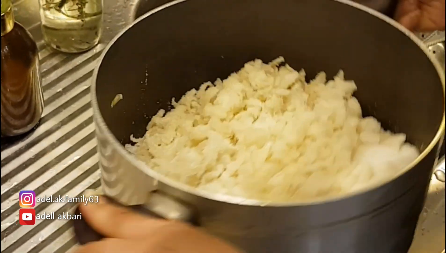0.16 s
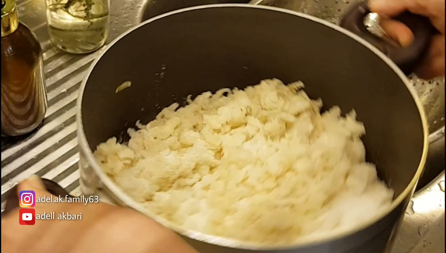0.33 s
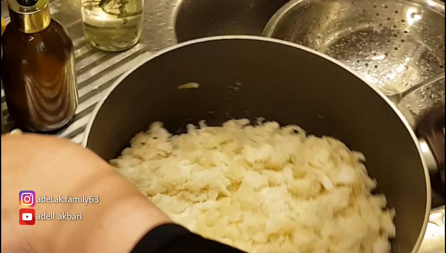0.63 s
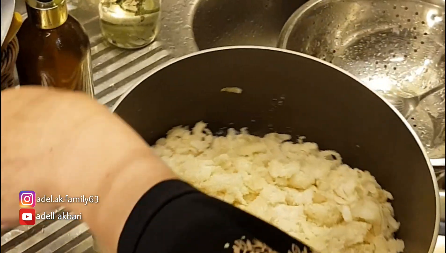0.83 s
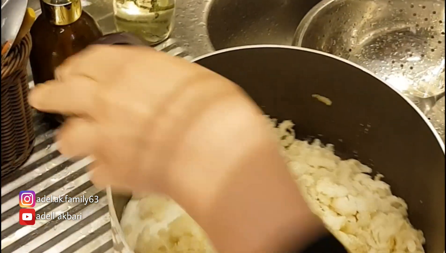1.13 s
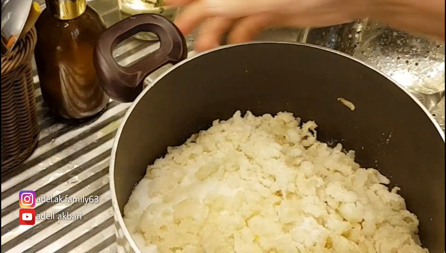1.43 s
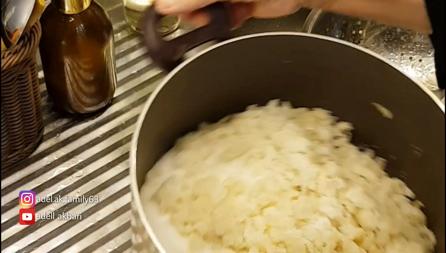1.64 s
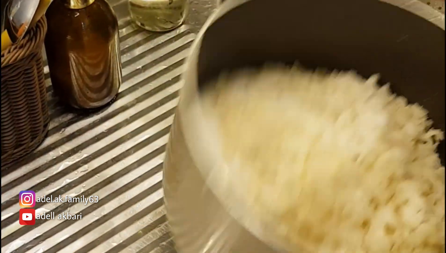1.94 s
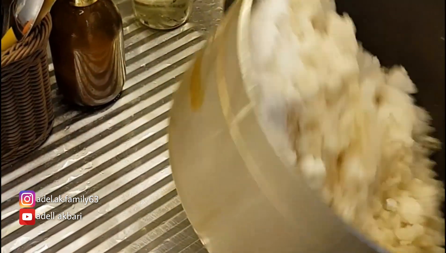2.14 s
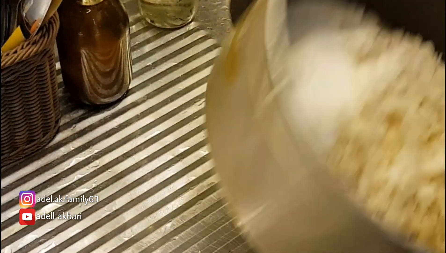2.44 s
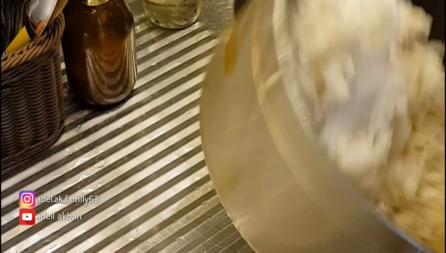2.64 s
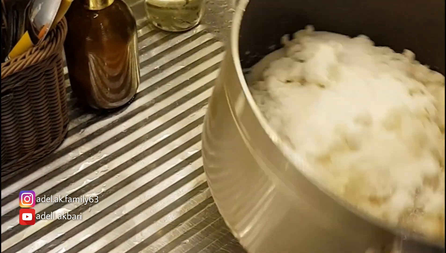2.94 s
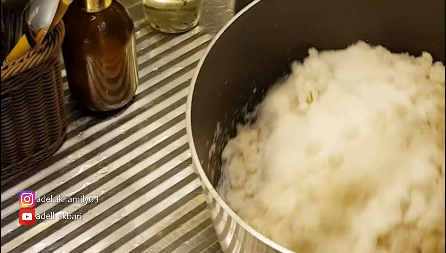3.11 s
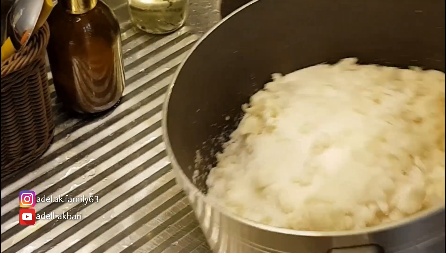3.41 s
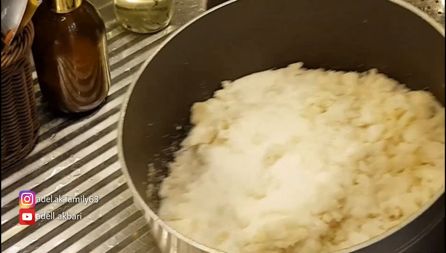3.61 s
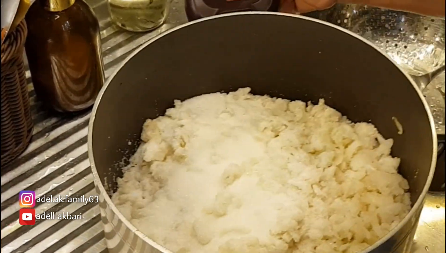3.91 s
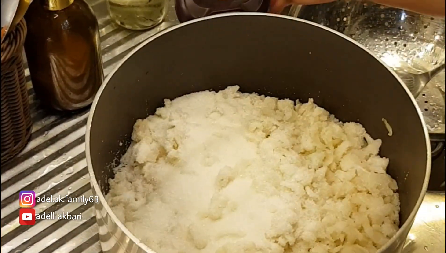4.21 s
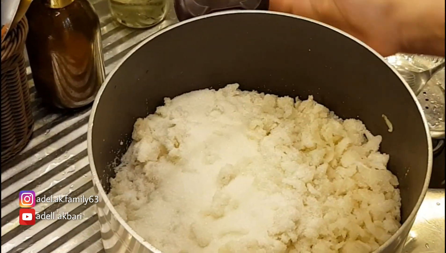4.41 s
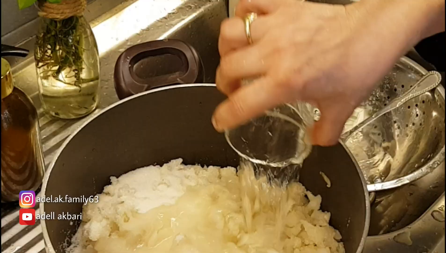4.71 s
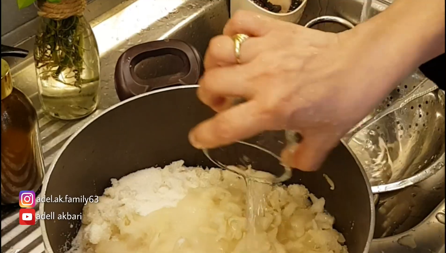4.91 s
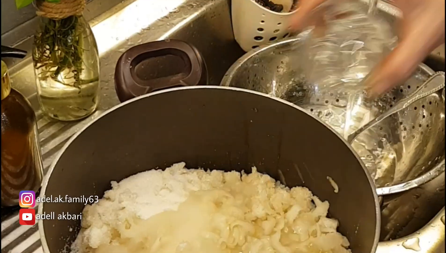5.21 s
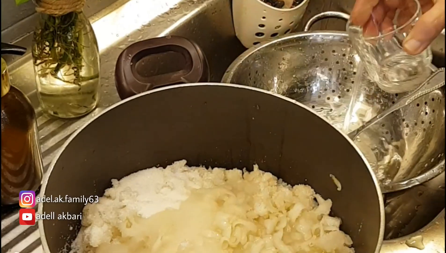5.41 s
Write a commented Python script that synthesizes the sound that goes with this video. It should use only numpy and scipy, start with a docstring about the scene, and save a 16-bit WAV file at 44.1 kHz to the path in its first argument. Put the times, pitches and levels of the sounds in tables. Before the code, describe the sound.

A close, wide stereo kitchen scene with low room rumble and a faint whining hiss. It begins almost silent, with a barely audible tick at 0.5 s. At 0.9 s a heavy steel pot hits a ribbed sheet-metal drainer: a loud crack, deep boom and bright rattle. From 1.15 to 1.3 s a tight cluster of clanks follows, the pot wall ringing briefly around 1 kHz, with scraping and a thin high squeak. Weaker scuffs and a tap come at 1.5-1.9 s. The food is tossed at 2.2-2.3 s and more strongly at 2.7-2.8 s: a grainy wet slide, a sharp slap, then settling crumbs. Quiet, with faint metallic rubbing, until a booming landing at 4.03 s and smaller knocks, scraping and rattling to 4.75 s. Sudden silence lasts about 0.1 s; from 4.88 s water splashes steadily, bubbly and bright, with metallic bowl resonance and small plinks, to the end.

```python
"""In a kitchen, a heavy steel pot of wet food is shifted, knocked and shaken on a ribbed sheet-steel drainer.
The sheet booms as a few low modes and rattles as shaped noise; the pot wall rings as decaying sines.
Rubbed metal sings, the food slides and slaps as grainy noise, and a faint whining hiss stands behind.
After a short silence a tap runs steadily into the sink: splash noise, bowl resonances and ringing bubbles."""
import sys
import numpy as np
from scipy import signal
from scipy.io import wavfile

SR = 44100
rng = np.random.default_rng(int(sys.argv[2]) if len(sys.argv) > 2 else 0)


def transcribe(u):
    """Save the signal u as a 16-bit wav file named by the first command-line argument.

    u: samples, shape (n,) or (channels, n), limited to [-1, 1]; the rate is SR.
    q: integer samples, one column per channel.
    """
    v = np.clip(np.atleast_2d(u).T, -1, 1)
    q = np.round(v * 32767).astype(np.int16)
    wavfile.write(sys.argv[1], SR, q)


N = 244755

# Knocks of the pot on the sheet: (time [s], rattle level [dB], rattle brightness [dB per octave],
# crack level [dB])
KNOCKS = [(0.517, -49.5, 8, -67), (0.8947, -13, 3.5, -17.5), (0.987, -33.5, -2, -20),
          (1.166, -14, 0, -22.5), (1.234, -16.5, 1, -24), (1.306, -21, 1.5, -43), (1.511, -41.5, 7.5, -48),
          (1.6764, -44, 8, -54), (1.774, -52.5, 11, -38), (1.857, -25.5, 3.5, -46), (3.142, -52, -4, -66),
          (3.929, -42.5, 1.5, -54), (4.028, -14.5, 3, -29), (4.1228, -24, 3, -33), (4.185, -23, 3.5, -25.5),
          (4.401, -23, 1, -34), (4.471, -27.5, 1.5, -39), (4.512, -29, 0.5, -35), (4.564, -39, -3.5, -37.5),
          (4.649, -26.5, 3.5, -36.5), (4.738, -35, -1.5, -35.5)]
# Movements of the pot over the drainer: (start [s], swell [s], hold [s], scrape level [dB],
# rumble level [dB], brightness [dB per octave])
MOVES = [(0, 0.017, 0.58, -70.5, -57, -6), (0.891, 0.0054, 0.073, -27.5, -27, 1),
         (1.143, 0.029, 0.11, -28, -28.5, 5.5), (1.381, 0.014, 0.14, -43, -46.5, -1),
         (1.691, 0.018, 0.053, -45.5, -56, 4), (1.722, 0.081, 0.16, -40, -35.5, 0.5),
         (2.201, 0.098, 0.035, -53.5, -61.5, 1), (2.695, 0.041, 0.1, -55.5, -61, 6),
         (3.736, 0.22, 0.14, -63.5, -48, -9.5), (4.015, 0.014, 0.19, -38, -29, -0.5),
         (4.263, 0.097, 0.38, -41, -35, 0.5)]
# Modes of the ribs: (frequency [Hz], width [Hz], level [dB])
RIBS = [(2300, 130, 0), (2530, 60, 3), (2850, 90, 0)]
# Likeness of the left and right channels: (frequency [Hz], correlation [-1 to 1])
LIKENESS = [(220, 0.98), (840, 0.082), (3150, -0.31), (11800, 0.2)]
# Stereo balance of the room tone and the splash: (frequency [Hz], left minus right [dB])
AIR_BALANCE = [(60, 1), (500, -1.5), (1430, -15.5), (4100, 8), (11800, 7.5)]


def from_db(db):
    """Level law: an amplitude gain is ten to the power of decibels over 20."""
    return 10 ** (np.asarray(db) / 20)


def rms_one(x):
    """Normalisation: a signal divided by its effective value has unit rms."""
    return x / np.sqrt(np.mean(x ** 2) + 1e-20)


def at_hz(points, hz):
    """Logarithmic pitch scale: a table is interpolated linearly over log frequency."""
    table_hz, values = np.array(points).T
    return np.interp(np.log(hz), np.log(table_hz), values)


def drift(rate):
    """Random modulation: noise low-passed near a rate [Hz] wanders slowly with unit rms."""
    step = 40  # samples between computed points
    r = np.exp(-2 * np.pi * rate * step / SR)
    white = rng.standard_normal(N // step + 2002)
    slow = signal.lfilter([1], [1, -2 * r, r * r], white)[2000:]  # the filter has settled
    return np.interp(np.arange(N) / step, np.arange(len(slow)), rms_one(slow))


def butter(x, order, hz, kind):
    """Butterworth filtering: the passband is maximally flat."""
    return signal.sosfilt(signal.butter(order, hz, kind, fs=SR, output="sos"), x)


def ring(clicks, hz, t60):
    """Impulse response of a damped oscillator: a unit click starts a sine of height 1 that dies away."""
    r = from_db(-60 / (t60 * SR))
    w = 2 * np.pi * hz / SR
    return signal.lfilter([0, np.sin(w)], [1, -2 * r * np.cos(w), r * r], clicks + 1e-18)


def resonate(x, modes, waver_db):
    """Modal superposition: parallel resonances add, each wavering in level."""
    out = 0
    for k, (hz, width, level_db) in enumerate(modes):
        r = np.exp(-np.pi * width / SR)
        poles = [1, -2 * r * np.cos(2 * np.pi * hz / SR), r * r]
        zeros = [(1 - r * r) / 2, 0, (r * r - 1) / 2]
        gain = (-1) ** k * from_db(level_db + waver_db * drift(11))  # alternate polarity
        out = out + gain * signal.lfilter(zeros, poles, x)
    return out


def resonant_noise(modes, waver_db, side_db):
    """Random excitation of resonators: stereo noise takes on the modes' colour; rms 1."""
    mid, side = rng.standard_normal((2, N))
    stereo = mid + from_db(side_db) * side * [[1], [-1]]
    return rms_one(resonate(stereo, modes, waver_db))


def noise_bands(spectrum, likeness, balance, patchy_db):
    """Band synthesis: half-octave stereo noises, each with its level, flicker and width, sum to rms 1."""
    edges = 30 * 2 ** np.arange(0, 8.6, .5)
    white = rng.standard_normal((2, 2, N))
    bands = {}
    for k, (low, high) in enumerate(zip(edges, edges[1:])):
        mid, side = butter(white[k % 2], 2, [low, high], "band")  # neighbours use different noise
        hz = np.sqrt(low * high)
        alike = np.clip(at_hz(likeness, hz), -1, 1)
        pair = np.sqrt(1 + alike) * mid + np.sqrt(1 - alike) * side * [[1], [-1]]
        lean = from_db(at_hz(balance, hz) * np.array([[.5], [-.5]]))
        level = from_db(at_hz(spectrum, hz) + patchy_db * drift(7.1))
        bands[hz] = level * lean * pair
    total = np.sqrt(np.mean(sum(bands.values()) ** 2))
    return {hz: band / total for hz, band in bands.items()}


def kitchen_air():
    """Background noise: low rumble and hiss flicker, with a narrow whine that fades and returns."""
    # Room tone: (frequency [Hz], relative density [dB per Hz])
    room_spectrum = [(59, 6.5), (140, -17.5), (189, -13.5), (1220, -44), (1870, -26), (5730, -32),
                     (11500, -32)]
    # Whine resonances: (frequency [Hz], width [Hz], relative level [dB])
    whine_modes = [(1840, 190, 6), (2600, 250, 1), (3820, 170, 5.5), (5740, 240, 4)]
    # Whine over time: (time [s], level [dB])
    whine_level = [(0, -61.5), (2.501, -70), (4.801, -57)]
    room_tone_db = -54.5
    tone = sum(noise_bands(room_spectrum, LIKENESS, AIR_BALANCE, patchy_db=4.0).values())
    whine = butter(resonant_noise(whine_modes, waver_db=2.5, side_db=-1.0), 4, 1500, "high")
    whine_db = np.interp(np.arange(N) / SR, *np.transpose(whine_level))
    return from_db(room_tone_db) * tone + from_db(whine_db) * whine


def moving(column, fade_db_per_s):
    """Exponential envelopes: the power of each move swells, holds and fades at a steady decibel rate."""
    t = np.arange(N) / SR
    swell_db = 27  # rise within the swell
    powers = []
    for move in MOVES:
        start, swell, hold = move[:3]
        rising_db = swell_db * np.clip(1 - (t - start) / swell, 0, 1)
        falling_db = fade_db_per_s * np.maximum(t - start - swell - hold, 0)
        powers.append((t >= start) * from_db(move[column] - rising_db - falling_db) ** 2)
    return np.array(powers)


def boom(rumble_db):
    """Low plate modes: thuds strike them as soft pushes, and sliding keeps them rumbling."""
    # Low sheet modes: (frequency [Hz], width [Hz], relative level [dB])
    low_modes = [(70.2, 7.9, 4.5), (78.7, 8.5, 2.5), (106.1, 8.1, 1.5), (181, 45.6, -10.5)]
    # The pot's weight lands or rocks over and flexes the sheet: (time [s], push level [dB])
    thuds = [(0.916, -19.5), (0.943, -34), (1.175, -30), (1.289, -34), (1.82, -33), (4.031, -25.5),
             (4.209, -33), (4.495, -34), (4.62, -38)]
    pushes = np.zeros(N)
    pushes[[round(s * SR) for s, db in thuds]] = from_db(np.array(thuds)[:, 1])
    struck = 0
    for hz, width, level_db in low_modes:
        t60 = np.log(1000) / (np.pi * width)  # a narrow mode rings long
        struck = struck + from_db(level_db) * ring(pushes, hz, t60)
    soft = butter(struck, 2, [55, 250], "band")
    rumble = from_db(rumble_db) * resonant_noise(low_modes, waver_db=0.5, side_db=-18)
    return soft * from_db([[.4], [-.4]]) + rumble


def scattered_modes(x):
    """Modal resonance: the clearer sheet modes are lifted out of its noise."""
    # Sheet modes that stand out of the rattle: frequency [Hz]
    clear_modes_hz = [399, 655, 1372, 1550, 1815, 2130, 3270, 4260]
    modes = [(hz, 25, 0.0) for hz in clear_modes_hz]  # width [Hz], level [dB]
    return x + resonate(x, modes, waver_db=3.5)


def sheet(scrape_db, brightness):
    """High modal density: modes merge into noise that follows the scrape and dies after knocks, treble first."""
    # Sheet colour: (frequency [Hz], relative density [dB per Hz])
    sheet_spectrum = [(76, -42.5), (130, -15), (280, -3.5), (520, -10.5), (760, -7), (1300, -14.5),
                      (2600, -18), (3600, -28.5), (5500, -27.5), (7400, -47), (10300, -37)]
    # Stereo balance of the sheet: (frequency [Hz], left minus right [dB])
    sheet_balance = [(60, 13), (350, -3), (840, 3), (2030, -8), (4890, 6.5), (11800, 4)]
    rattle_db, rib_db = -6.5, -4  # rattle against the knock level; rib colour against the rattle
    knock_t60 = 0.32  # s at 1500 Hz
    age = np.arange(SR // 2) / SR
    chatter = from_db(1.8 * drift(90))  # the pot base chatters over the ribs
    out = 0
    for hz, band in noise_bands(sheet_spectrum, LIKENESS, sheet_balance, patchy_db=1.0).items():
        octaves = np.log2(hz / 1500)
        power = from_db(scrape_db + brightness * octaves) ** 2
        decay_db = -60 * age / (knock_t60 * 2 ** (-.2 * octaves))
        rise = 1 - np.exp(-age * hz / 1.9)  # lows take longer to build up
        for s, knock_db, tilt_db, _ in KNOCKS:
            at = round(s * SR)
            rattle = rise * from_db(knock_db + rattle_db + tilt_db * octaves + decay_db)
            power[at:at + len(age)] += rattle[:N - at] ** 2
        out = out + np.sqrt(power) * chatter * band
    return scattered_modes(out) + from_db(rib_db) * resonate(out, RIBS, waver_db=-6.0)


def cracks():
    """Impact excitation: a quick burst of grit at each knock rings the ribs."""
    t = np.arange(N) / SR
    crack_t60 = 0.075  # s
    burst = 0
    for s, _, _, crack_db in KNOCKS:
        burst = burst + (t >= s) * from_db(crack_db - 60 * np.clip(t - s, 0, 1) / crack_t60)
    mid, side = rng.standard_normal((2, N))
    grit = burst * (mid + 0.64 * side * [[1], [-1]]) + 1e-18
    return 2.6 * resonate(grit, RIBS, waver_db=.5) + .2 * butter(grit, 2, 1500, "high")


def pot():
    """Free vibration: each tap excites every wall mode by chance; the next tap damps what still rings."""
    # Taps on the pot wall: (time [s], level [dB])
    taps = [(0.911, -20.5), (0.955, -26), (0.989, -25), (1.188, -13), (1.210, -18.5), (1.226, -22),
            (1.24, -14.5), (1.251, -17), (1.273, -18), (1.853, -19.5), (4.444, -19.5)]
    # Wall modes: (frequency [Hz], relative level [dB], 60 dB decay time [s])
    wall_modes = [(925, -4, 0.12), (1024, 1.5, 0.08), (2110, -20, 0.05), (2800, -25, 0.05),
                  (4520, -32, 0.07), (5950, -33, 0.06)]
    contact = 0.0012  # s, time constant of build-up and damping
    out = np.zeros(N + SR)
    age = np.arange(SR // 4) / SR
    for (s, tap_db), (following, _) in zip(taps, taps[1:] + [(N / SR, 0)]):
        damping = np.exp(-np.maximum(age - following + s, 0) / contact)
        shape = (1 - np.exp(-age / contact)) * damping
        strengths_db = rng.normal(0, 1.0, len(wall_modes))
        for (hz, level_db, t60), chance_db in zip(wall_modes, strengths_db):
            height = from_db(tap_db + level_db + chance_db - 60 * age / t60)
            out[round(s * SR):][:len(age)] += shape * height * np.sin(2 * np.pi * hz * age)
    return out[:N]


def singing():
    """Friction-driven oscillation: a rubbed mode swells fast and thins out; phase wander sets its line width."""
    # Metal rubbed until it sings: (start [s], length [s], frequency [Hz], line width [Hz], level [dB])
    songs = [(0.945, 0.11, 5430, 25, -53), (1.292, 0.18, 5425, 10, -45), (2.695, 0.22, 444, 110, -57),
             (3.009, 0.22, 965, 20, -69), (3.666, 0.13, 1830, 260, -60.5)]
    t = np.arange(N) / SR
    out = 0
    for s, length, hz, width, level_db in songs:
        swell = np.sin(np.pi * np.clip((t - s) / length, 0, 1) ** .6) ** .7
        wander = np.cumsum(rng.standard_normal(N)) * np.sqrt(2 * np.pi * width / SR)
        phase = 2 * np.pi * hz * t + wander + [[0], [1]]  # right leads by 1 radian
        out = out + from_db(level_db + 1.5 * drift(30)) * swell * np.sin(phase)
    return out


def food():
    """Granular excitation: a slide swells and eases, a sharp slap hits the wall, and crumbs settle after it."""
    # The pot is tossed: ((slide start [s], slide level [dB]), (slap time [s], slap level [dB]))
    tosses = [((2.212, -47), (2.308, -32)), ((2.706, -43), (2.79, -24))]
    # Wet rustle: (frequency [Hz], width [Hz], level [dB])
    rustle_modes = [(3110, 105, -7), (3580, 120, 0), (4300, 860, -4.5), (6460, 570, -3.5), (9580, 1000, -8)]
    t = np.arange(N) / SR
    slide, slap = 0, 0
    for (start, slide_db), (s, slap_db) in tosses:
        onset = np.clip((t - start) / 0.016, 0, 1)
        arch = 0.63 + 1.18 * np.sin(np.pi * np.clip((t - start) / (s - start), 0, .8))
        settling_db = -60 * np.maximum(t - s, 0) / 0.55
        slide = slide + onset * arch * from_db(slide_db + settling_db)
        slap = slap + (t > s) * from_db(slap_db - 60 * np.clip(t - s, 0, 1) / .025)
    grain_rate = 3000 * from_db(4.0 * drift(40))  # per second
    grains = rng.standard_normal((2, N)) * (rng.random((2, N)) < grain_rate / SR)
    smack = slap * rng.standard_normal(N) + 1e-18
    tick = 0.098 * butter(smack, 2, 2500, "high")
    return resonate(slide * rms_one(grains) + smack, rustle_modes, waver_db=1.5) + tick


def bubbles():
    """Bubble resonance: small bubbles ring at random on either side; larger ones swell and rise in pitch."""
    # Larger bubbles: (time [s], level [dB], starting frequency [Hz])
    plinks = [(4.967, -33.5, 2870), (4.990, -30, 1945), (5.013, -35, 2050), (5.113, -46, 1400),
              (5.256, -35, 1340), (5.293, -36.5, 2620), (5.492, -34, 1330)]
    bubble_db = -51.5  # the small bubbles together
    signs = rng.choice([-1, 1], (2, N))
    sizes = from_db(3.6 * np.minimum(rng.exponential(1, (2, N)), 5)) * signs
    birth_rate = 700 * from_db(3.0 * drift(25))  # per second and side
    born = rng.random((2, N)) < birth_rate / SR
    dealt = rng.integers(0, 24, (2, N))  # which pitch each bubble gets
    small = 0
    for k, hz in enumerate(np.geomspace(1250, 5000, num=24)):
        small = small + ring(sizes * born * (dealt == k), hz, 79.0 / hz)  # 79 cycles to -60 dB
    out = from_db(bubble_db) * rms_one(small)
    for s, plink_db, hz in plinks:
        age = np.clip(np.arange(N) / SR - s, 0, 1)
        shape = (1 - np.exp(-age / 0.0017)) * from_db(plink_db - 60 * age * hz / 60.0)
        out = out + shape * np.sin(2 * np.pi * hz * age * (1 + 1.9 * age))
    return out


def water():
    """Jet impact: turbulent splash noise, a drummed bowl and trapped air sound together."""
    # Splash colour: (frequency [Hz], relative density [dB per Hz])
    splash_spectrum = [(112, 0), (151, -12), (319, -15.5), (802, -27.5), (1350, -39), (1610, -32.5),
                       (1780, -18.5), (5870, -26.5), (11500, -32)]
    # Bowl modes: (frequency [Hz], width [Hz], relative level [dB])
    bowl_modes = [(1355, 120, -2), (1717, 28, 4), (1990, 120, -2), (3433, 30, -2), (5850, 500, -5),
                  (9500, 500, -14)]
    # The jet breaks up: (time [s], swell of bubbles and of the splash above 3 kHz [dB])
    splashes = [(4.963, 6.5), (5.18, 3.5), (5.293, 6), (5.385, 1), (5.54, 4.5)]
    splash_db, bowl_db = -40.5, -45.5  # splash level before its swell; bowl level
    t = np.arange(N) / SR
    swell_db = 1.2 * drift(15)
    for s, level_db in splashes:
        swell_db = swell_db + level_db * np.exp(-((t - s) / .014) ** 2)
    splash = 0
    for hz, band in noise_bands(splash_spectrum, LIKENESS, AIR_BALANCE, patchy_db=1.5).items():
        splash = splash + band * from_db(swell_db * min(hz / 3000, 1))  # lows swell less
    bowl = from_db(bowl_db) * resonant_noise(bowl_modes, waver_db=4.5, side_db=1.5)
    return from_db(splash_db) * splash + bowl + from_db(swell_db) * bubbles()


def scene():
    """Superposition: pot, drainer and room sound together, then a moment of silence, then the tap."""
    # The silence: (start [s], end [s])
    silence = (4.784, 4.884)
    t = np.arange(N) / SR
    # The pot merely held: scrape and rumble power, brightness in dB per octave
    rest_scrape, rest_rumble, rest_brightness = from_db(-87) ** 2, from_db(-63) ** 2, -11
    scrapes = moving(column=3, fade_db_per_s=108.5)
    rumble = moving(column=4, fade_db_per_s=95).sum(axis=0) + rest_rumble
    scrape = scrapes.sum(axis=0) + rest_scrape
    # Power-weighted mean: the loudest move sets the colour
    brightness = (np.array(MOVES)[:, -1] @ scrapes + rest_brightness * rest_scrape) / scrape
    drainer = boom(10 * np.log10(rumble)) + sheet(10 * np.log10(scrape), brightness) + cracks()
    before = drainer + pot() * from_db([[.7], [-.7]]) + singing() + food() + kitchen_air()
    fade_out = np.clip((silence[0] - t) / .003, 0, 1)
    fade_in = np.clip((t - silence[1]) / .003, 0, 1)
    return fade_out * before + fade_in * water()


def record(dry):
    """Band limitation: the deepest bass is cut gently and the top above 11750 Hz steeply."""
    thin = butter(dry, 3, 42, "high")
    return signal.sosfilt(signal.ellip(12, .5, 70, 11750, fs=SR, output="sos"), thin)


dry = scene()
out = record(dry)
transcribe(out)
```